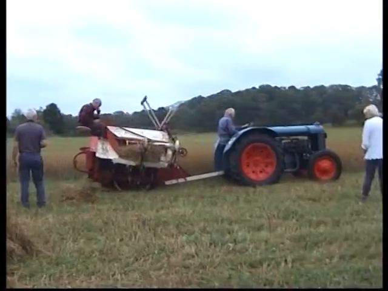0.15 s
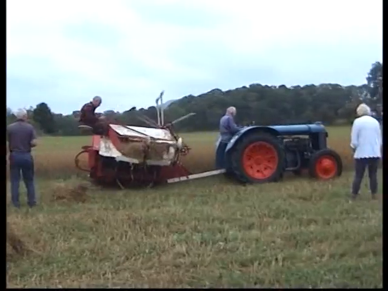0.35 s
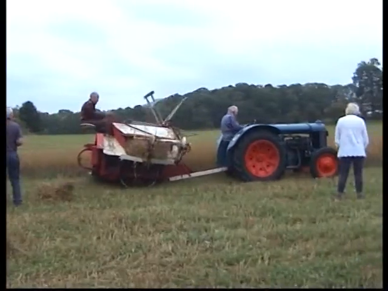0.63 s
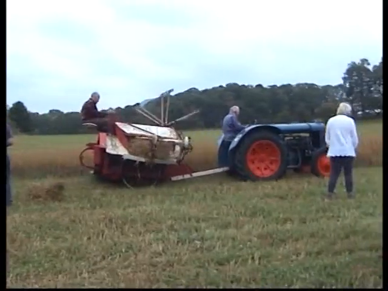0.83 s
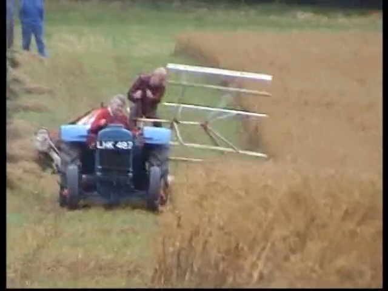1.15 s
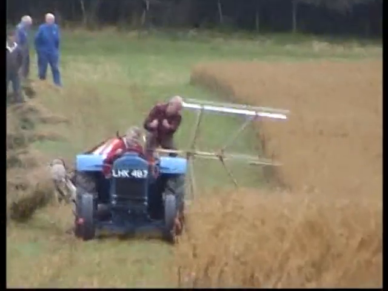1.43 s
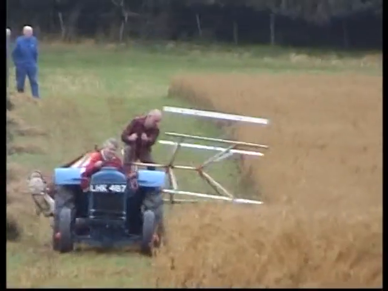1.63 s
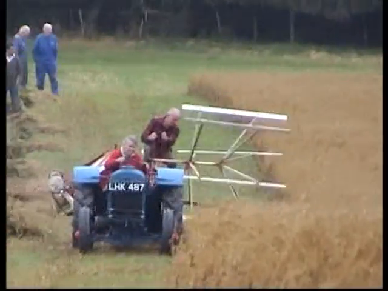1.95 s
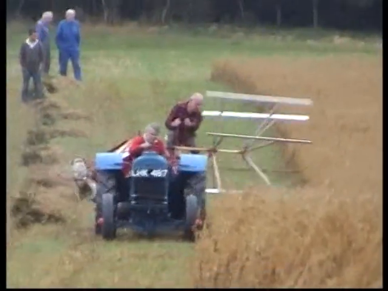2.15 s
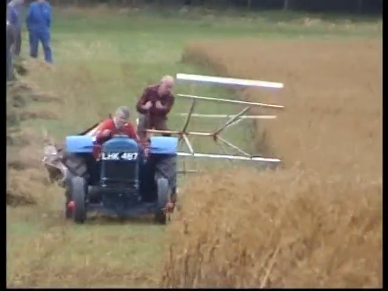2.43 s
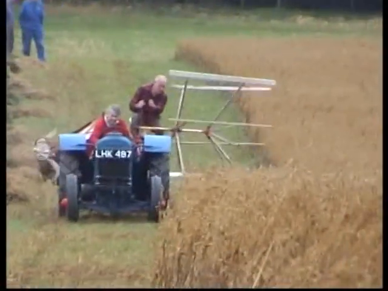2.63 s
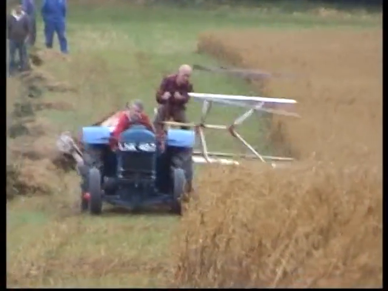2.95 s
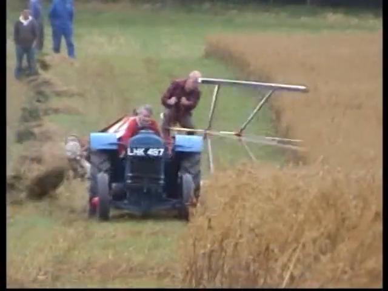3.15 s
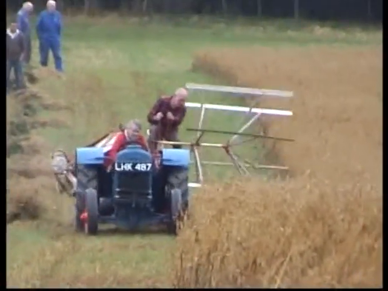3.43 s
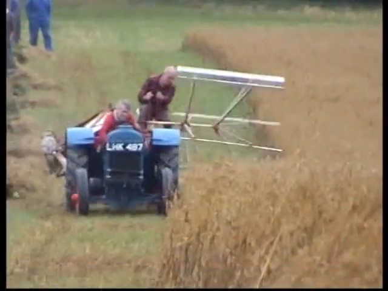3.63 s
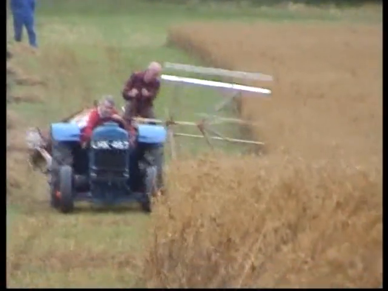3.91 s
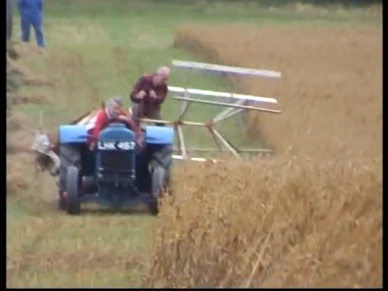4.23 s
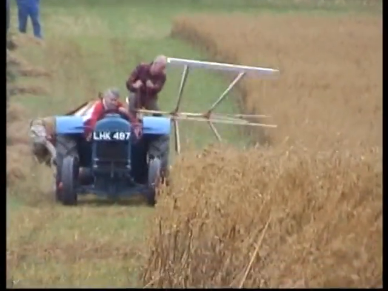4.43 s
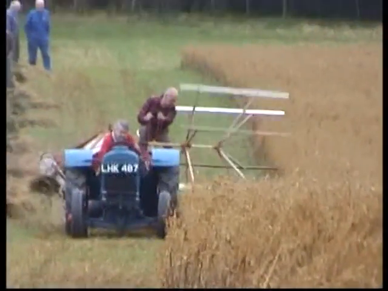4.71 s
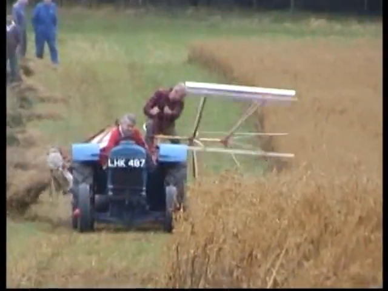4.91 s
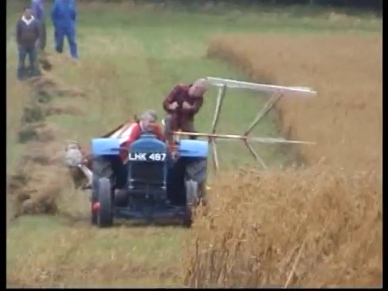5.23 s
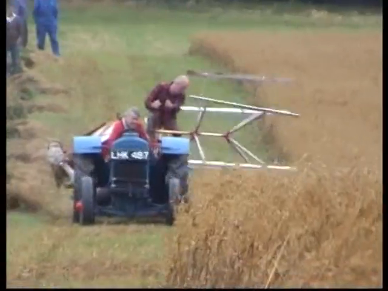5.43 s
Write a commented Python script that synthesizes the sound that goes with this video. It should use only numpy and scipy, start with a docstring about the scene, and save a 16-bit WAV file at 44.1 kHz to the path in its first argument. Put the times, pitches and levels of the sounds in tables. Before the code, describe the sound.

Loud throbbing engine, whining fan and rapid chain ticking suddenly drop to a soft, far-off tractor hum with cutting rustle and occasional metal clashes.

```python
"""An old four-cylinder tractor pulls a reaper-binder through a grain field, heard from two positions in turn.
Close and side-on, each firing drives an exhaust throb and rings the block; the fan whines, a drive chain ticks.
At 1.04 s it is abruptly far off and head-on: a soft drone of firing-rate harmonics, coloured noise for the
cutting, sheaves thrown out with metal clashes, small clinks, one dull knock, gliding chirps, faint steady tones."""
import sys
import numpy as np
from scipy import signal
from scipy.fft import rfft, irfft, next_fast_len
from scipy.io import wavfile

SR = 44100
rng = np.random.default_rng(int(sys.argv[2]) if len(sys.argv) > 2 else 0)


def transcribe(u):
    """Save the signal u as a 16-bit wav file named by the first command-line argument.

    u: samples, shape (n,) or (channels, n), limited to [-1, 1]; the rate is SR.
    q: integer samples, one column per channel.
    """
    v = np.clip(np.atleast_2d(u).T, -1, 1)
    q = np.round(v * 32767).astype(np.int16)
    wavfile.write(sys.argv[1], SR, q)


N = 245637
TIME = np.arange(N) / SR
CUT_S = 1.0375  # end of the close position
FAN_PER_FIRING = 6.487  # fan blades passing per firing

# Resonances of the engine block: frequency_hz, width_hz, level_db
BLOCK_MODES = [(1093, 18, -6), (1275, 45, 2.5), (1335, 25, -6), (1443, 26, -2.5), (1513, 26, -2.5),
               (1690, 30, 0), (1900, 35, -2), (2005, 30, -2.5), (2190, 50, 0), (2350, 60, 1.5),
               (2546, 45, 3.5), (2660, 50, .5), (2810, 55, 2.5), (2900, 45, -1), (3290, 60, 4.5),
               (3560, 70, 3), (3730, 60, 3), (4720, 55, -1.5), (5090, 130, 1)]
# Resonances of the thin engine cover: frequency_hz, width_hz, level_db
COVER_MODES = [(3420, 89, -10), (3770, 110, -9), (4190, 60, -2), (4280, 70, 1), (4470, 58, -6),
               (4650, 180, -5)]
# The cylinders side-on, in firing order: puff_db, crack_db, block_db, cover_db
NEAR_FIRING_ORDER = [(-5.5, -22, -30.5, -32.5), (5.5, -24.5, -32, -20), (-3, -22.5, -28.5, -24),
                     (1.5, -27.5, -32.5, -19.5)]
# Coherence of left and right, close: frequency_hz, likeness (0 to 1)
NEAR_LIKENESS = [(500, .99), (2000, .97), (4000, .95), (8000, .72), (13000, .65)]
# Coherence of left and right, distant: frequency_hz, likeness (0 to 1)
FAR_LIKENESS = [(60, 0.61), (150, 0.46), (370, 0.38), (910, 0.52), (2260, 0.59), (5610, 0.43),
                (13900, 0.21)]


def from_db(db):
    """Amplitude ratio of a level: 20 dB is a factor of ten."""
    return np.exp(np.asarray(db) * (np.log(10) / 20))


def rms_one(x):
    """Normalise the effective value to 1."""
    return x / np.sqrt(np.mean(x ** 2) + 1e-20)


def in_time(rows):
    """Linear interpolation of each column against its first, at every sample."""
    s, *columns = np.transpose(rows)
    return [np.interp(TIME, s, column) for column in columns]


def per_bin(points):
    """Interpolation on a logarithmic frequency axis, at every FFT bin."""
    hz, value = np.transpose(points)
    bins_hz = np.fft.rfftfreq(next_fast_len(N), 1 / SR)
    return np.interp(np.log(bins_hz + 1), np.log(hz), value)


def colour(x, gain):
    """Linear filtering as multiplication of the spectrum."""
    size = next_fast_len(N)
    return irfft(rfft(x, size) * gain, size)[..., :N]


def drift(rate):
    """Slow chance: unit-spread random knots, rate per second, joined by straight lines."""
    knots = rng.standard_normal(int(N / SR * rate) + 2)
    return np.interp(TIME * rate, np.arange(len(knots)), knots)


def noise(likeness, spectrum=None):
    """Stereo noise of unit rms whose mid and side powers set the coherence in each band."""
    alike = np.clip(per_bin(likeness), 0, 1)
    gain = 1 if spectrum is None else from_db(per_bin(spectrum))
    mid, side = colour(rng.standard_normal((2, N)), gain * np.sqrt([1 + alike, 1 - alike]))
    return rms_one(np.array([mid + side, mid - side]))


def resonate(x, modes):
    """Parallel two-pole resonators; bandwidth fixes the damping, and alternate modes change sign."""
    out = 0
    for k, (hz, width, db) in enumerate(modes):
        r = np.exp(-np.pi * width / SR)
        poles = [1, -2 * r * np.cos(2 * np.pi * hz / SR), r * r]
        ring = (1 - r * r) / 2 * signal.lfilter([1, 0, -1], poles, x + 1e-18)
        out = out + (-1) ** k * from_db(db) * ring
    return out


def clicks(times, db):
    """Ideal impulses, one sample per event."""
    out = np.zeros(N)
    at = np.clip(np.round(np.asarray(times) * SR).astype(int), 0, N - 1)
    np.add.at(out, at, from_db(db))
    return out


def bursts(times, db, rise_s, decay_s):
    """Envelope of contacts: two exponentials in cascade give a quick swell and a decay."""
    rise, fall = np.exp(-1 / (SR * rise_s)), np.exp(-1 / (SR * decay_s))
    poles = np.convolve([1, -rise], [1, -fall])
    return signal.lfilter([1 - rise], poles, clicks(times, db) + 1e-18)


def strike(times, db, modes, spread_db, scatter_s, detune):
    """Modal impact: each hit rings every mode with its own strength, delay and pitch, decaying exponentially."""
    out = np.zeros(N)
    for hz, width, mode_db in modes:
        force, contact = rng.standard_normal((len(times), 2)).T
        starts = (np.maximum(times + scatter_s * rng.random(len(times)), 0) * SR).astype(int)
        gains = from_db(db + mode_db + np.clip(spread_db * force, -15, 5))
        pitches = hz * (1 + detune * contact)
        age = np.arange(int(1.5 * SR / width)) / SR
        fade = np.exp(-np.pi * width * age)
        for start, gain, pitch in zip(starts, gains, pitches):
            room = len(out[start:start + len(age)])
            ring = gain * fade * np.sin(2 * np.pi * pitch * age)
            out[start:start + room] += ring[:room]
    return out


def lines(turns, orders, flutter_db, flutter_rate, smear=0):
    """Fourier series of a rotating part; a cycle of four firings allows quarter multiples, smeared in phase."""
    out = 0
    for multiple, db in orders:
        k = round(4 * multiple) / 4
        late = smear * rng.uniform(-.5, 0.44) * (k % 1 > 0)  # whole multiples stay in phase
        level = from_db(db + flutter_db * drift(flutter_rate))
        out = out + level * np.cos(2 * np.pi * (k * turns + late))
    return np.sqrt(2) * out


def firings(turns, cylinders, uneven_db):
    """Periodic excitation: time and level of each whole turn, cycling through cylinders with random unevenness."""
    number = np.floor(turns).astype(int)
    at = np.flatnonzero(np.diff(number)) + 1
    db = np.take(cylinders, number[at], mode="wrap")
    return TIME[at], db + uneven_db * rng.standard_normal(len(at))


def place(x, balance, lag):
    """Stereo localisation by level difference per band and a right-side delay of lag samples."""
    tilt = per_bin(balance) / 2
    delay = np.exp(-2j * np.pi * np.fft.rfftfreq(next_fast_len(N)) * lag)
    return colour(x, np.array([from_db(tilt), from_db(-tilt) * delay]))


def steady_tones():
    """Stationary sinusoids: a low hum and a cluster of thin high tones."""
    # Faint tones: frequency_hz, level_db
    tones = [(50, -74), (100, -67.5), (350, -79), (400, -88), (5740, -84), (5806, -89), (5890, -92),
             (6254, -90.5), (6322, -91), (6369, -94)]
    return np.sqrt(2) * sum(from_db(db) * np.sin(2 * np.pi * (hz * TIME + rng.random())) for hz, db in tones)


def chirps():
    """Frequency modulation: faint whistles glide, waver and fade, phase being the integral of pitch."""
    # Chirps and squeaks: start_s, length_s, start_hz, end_hz, level_db, waver (share of pitch)
    whistles = [(1.125, .055, 5000, 5300, -69.5, .025), (1.463, .03, 7300, 6100, -74, .02),
                (1.483, .035, 5280, 5450, -72, .015), (1.515, .13, 4830, 4770, -71, .005),
                (1.518, .035, 7250, 7150, -74, .025), (1.6, .04, 7200, 7150, -74, .025),
                (2.035, .05, 4500, 4770, -71, .01), (2.1, .045, 4640, 4700, -72, .007),
                (2.47, .12, 3380, 3320, -69, .02), (2.865, .085, 4100, 4020, -71, .005)]
    out, waver = np.zeros(N), drift(500)
    for s, length, start_hz, end_hz, db, rough in whistles:
        now = (TIME >= s) & (TIME < s + length)
        along = (TIME[now] - s) / length
        glide = end_hz + (start_hz - end_hz) * (1 - along) ** 2
        pitch = glide * (1 + rough * waver[now])
        swell = np.sqrt(2 * np.abs(np.sin(np.pi * along)))
        out[now] += from_db(db) * swell * np.sin(2 * np.pi * np.cumsum(pitch) / SR)
    return out * from_db(1.5 * drift(120))


def thud():
    """Heavily damped modes: a dull knock with a slight rebound."""
    # Blow and rebound: start_s, level_db
    blows = [(3.2495, -37), (3.2558, -46)]
    # Resonances of the struck part: frequency_hz, width_hz, level_db
    dull_modes = [(470, 100, -11), (640, 90, 2), (760, 130, -9), (1450, 160, -10), (1920, 260, -3.5)]
    s, db = np.transpose(blows)
    ring = strike(s, db, dull_modes, spread_db=0, scatter_s=0, detune=0)
    return signal.sosfilt(signal.butter(2, [330, 2700], "band", fs=SR, output="sos"), ring)


def binder_clinks():
    """Impact with rebound: loose metal parts touch, bounce once and ring briefly at one mode."""
    # Single clinks: start_s, frequency_hz, level_db
    clinks = [(1.762, 4400, -67), (1.958, 3330, -61), (2.287, 2400, -65), (2.513, 3380, -60),
              (2.635, 3280, -62), (2.767, 3300, -59), (2.828, 4450, -60), (3.042, 3870, -60),
              (3.043, 2600, -57), (3.152, 3800, -58), (3.289, 4470, -60), (3.443, 4330, -57),
              (3.467, 4330, -58), (3.506, 4460, -59), (3.641, 3200, -58), (3.665, 4550, -61),
              (3.692, 3200, -61), (4.128, 3700, -56), (4.16, 4200, -59), (5.222, 3800, -58)]
    width_hz, bounce_s = 41, 0.0045
    out = np.zeros(N)
    for s, hz, db in clinks:
        contacts = np.array([s, s + bounce_s])
        out += strike(contacts, db, [(hz, width_hz, 0)], spread_db=1, scatter_s=.001, detune=.02)
    return out


def binder_clashes():
    """Noise under impact envelopes: the discharge arms clash and the sheaf crackles out more slowly."""
    # Sheaves thrown out: start_s, strength_db (relative)
    clashes = [(1.6945, -44), (3.1423, -48), (3.428, -38), (3.4484, -55), (3.5086, -52), (3.5262, -54),
               (5.169, -43)]
    # Spectrum of the clash: frequency_hz, level_db
    clash_colour = [(1000, -13), (2300, 0), (4400, 4), (6000, -1), (8200, -4), (11000, -18), (13000, -33)]
    s, db = np.transpose(clashes)
    clash = bursts(s, db - 8.5, rise_s=0.0015, decay_s=0.0064)
    straw = bursts(s, db - 22, rise_s=0.0081, decay_s=0.04) * from_db(3 * drift(250))
    return noise(FAR_LIKENESS, clash_colour) * (clash + straw)


def far_chatter():
    """Random impacts on lightly damped modes: the binder's steel parts chatter without pause."""
    # Resonances of the steel parts: frequency_hz, width_hz, level_db
    chatter_modes = [(1090, 14, -1), (1490, 60, 6), (1700, 50, 4), (2010, 60, 0), (2320, 60, 3),
                     (2470, 70, 2), (2680, 55, 1), (3020, 60, -1), (3180, 60, 1), (3360, 40, 1),
                     (3530, 70, -2), (4070, 50, -2), (4230, 60, -1)]
    s = rng.uniform(CUT_S, N / SR, size=300)
    return strike(s, -71.5, chatter_modes, spread_db=5, scatter_s=.02, detune=.006)


def far_tappet(turns):
    """Cyclic impact: a loose tappet ticks once per engine cycle of four firings."""
    # Strength of the tick: time_s, level_db
    tick_strength = [(1.1, -74), (3.3, -68), (3.7, -58), (4.6, -59), (5.57, -66)]
    # Resonances of the tick: frequency_hz, width_hz, level_db
    tick_modes = [(2310, 64, 1.5), (2420, 73, -6)]
    after_firings = .8  # place in the cycle
    s, db = firings((turns - after_firings) / 4, [0], uneven_db=1.5)
    db = db + np.interp(s, *np.transpose(tick_strength))
    return strike(s, db, tick_modes, spread_db=2, scatter_s=.003, detune=.015)


def far_cutting(effort_db):
    """Broadband noise with slight level fluctuation: the machinery's murmur and the rustle of cutting."""
    # Spectrum of the machinery: frequency_hz, level_db
    machinery_colour = [(150, -23), (380, -7.5), (520, -0.5), (690, 4), (850, 1), (1100, -3), (1500, -2),
                        (1850, -10), (2600, -29)]
    # Spectrum of the rustle: frequency_hz, level_db
    rustle_colour = [(1200, -27), (1900, -3.5), (2400, 2.5), (2800, -0.5), (3400, -0.5), (3900, -3),
                     (4400, -1.5), (5100, -8), (6500, -6.5), (8500, -17.5), (10500, -13), (11900, -35),
                     (12700, -39)]
    machinery = from_db(effort_db + 8.5 + 0.77 * drift(60)) * noise(FAR_LIKENESS, machinery_colour)
    rustle = from_db(-63.5 + 1.1 * drift(120)) * noise(FAR_LIKENESS, rustle_colour)
    return machinery + rustle


def far_fan(turns):
    """Blade-passing harmonics locked to the engine: a hum, and a whine of varying level at the third."""
    # Hum lines: multiple of the blade rate, level_db
    hum_lines = [(1, -63), (2, -76), (4, -74), (5, -91)]
    # Level of the whine: time_s, level_db (the line lies 1.5 dB lower)
    whine_level = [(1.1, -69), (1.2, -63.5), (1.27, -70), (1.34, -63.5), (1.42, -70), (1.9, -73),
                   (1.95, -64), (2.43, -69), (3.3, -65), (3.5, -63), (3.81, -60), (3.86, -66.5),
                   (5.27, -68.5), (5.44, -59), (5.57, -70)]
    whine_db, = in_time(whine_level)
    blades = turns * FAN_PER_FIRING + 0.02 * drift(12)
    hum = lines(blades, hum_lines, flutter_db=1.5, flutter_rate=8)
    return hum + from_db(whine_db) * lines(blades, [(3, -1.5)], flutter_db=2.5, flutter_rate=22)


def far_knocks(turns):
    """Modal ringing at a distance: each firing clinks the block, every second one rings the cover."""
    # Strength of the cover's ring: time_s, level_db
    cover_strength = [(1.1, -67), (2.5, -66), (2.85, -63), (3.6, -63), (3.9, -65), (4.4, -64.5),
                      (5.57, -66.5)]
    cover_lead_s = 0.01  # ahead of the puff
    s, _ = firings(turns, [0], uneven_db=0)
    ring = strike(s, 0, BLOCK_MODES, spread_db=5, scatter_s=0.02, detune=0.0044)
    block = from_db(-72) * rms_one(ring)
    s, db = firings(turns / 2, [0], uneven_db=1.5)
    db = db + np.interp(s, *np.transpose(cover_strength))
    cover = strike(s - cover_lead_s, db, COVER_MODES, spread_db=2, scatter_s=.012, detune=.03)
    return block + cover


def far_exhaust(turns, effort_db):
    """Harmonics of the firing rate form a drone, over impulse-driven pipe resonances and low noise."""
    # Exhaust lines: multiple of the firing rate, level_db
    exhaust_lines = [(1, -68.5), (1.25, -77), (1.75, -73.5), (2, -59.5), (2.25, -78), (2.5, -76.5),
                     (3, -69), (3.25, -70), (3.5, -74.5), (3.75, -72), (4, -64), (4.25, -72), (4.5, -73),
                     (4.75, -75.5), (5, -73.5), (5.25, -77), (5.5, -75.5), (5.75, -79), (6, -79.5),
                     (6.25, -78), (6.75, -82), (7, -83), (7.5, -78)]
    # Relative puff of each cylinder in firing order: level_db
    cylinders = [10, -11, 1, 0]
    # Resonances of the pipe: frequency_hz, width_hz, level_db
    pipe_modes = [(112, 18, 0), (203, 22, -4), (274, 15, -2)]
    # Puffs hardening under load: time_s, level_db
    load = [(1.1, -79), (3, -77), (3.5, -72), (5.1, -75.5), (5.35, -65), (5.57, -66)]
    # Spectrum of the rumble: frequency_hz, level_db
    rumble_colour = [(22, -33), (34, -18), (48, -12), (62, -5), (85, -10), (110, -0.5), (170, 0.5),
                     (260, -1.5), (380, -9.5), (700, -36)]
    throb = lines(turns, exhaust_lines, flutter_db=1, flutter_rate=6, smear=1)
    puff_db, = in_time(load)
    puffs = rms_one(resonate(clicks(*firings(turns, cylinders, uneven_db=1.0)), pipe_modes))
    rumble = from_db(effort_db + 8) * noise(FAR_LIKENESS, rumble_colour)
    return throb + from_db(puff_db) * puffs + rumble


def far_rig():
    """Superposition from afar: engine phase, the integral of its speed, times drone, fan and knocks."""
    # Engine speed: time_s, firings_per_s
    engine_speed = [(1.1, 37.0), (1.55, 37.3), (1.8, 36.65), (2.05, 36.45), (2.28, 37.05), (2.65, 37.2),
                    (2.85, 36.85), (3.1, 37.0), (3.42, 36.35), (3.75, 36.65), (4.0, 37.05), (4.3, 36.7),
                    (4.85, 36.4), (5.2, 36.75), (5.42, 37.35), (5.57, 36.8)]
    # Engine effort, a little more at the end: time_s, effort_db (each noise layer adds its own offset)
    effort = [(1.1, -65.5), (5.15, -65), (5.45, -63.5)]
    phase_zero_s = 3.24  # a firing at which the cycle's phase is zero
    speed, = in_time(engine_speed)
    effort_db, = in_time(effort)
    turns = np.cumsum(speed) / SR
    turns = turns - np.interp(phase_zero_s, TIME, turns)
    engine = far_exhaust(turns, effort_db) + far_knocks(turns) + far_tappet(turns)
    return engine + far_fan(turns) + far_cutting(effort_db) + far_chatter()


def near_wash():
    """Broadband noise whose level flutters, plus panel resonances driven by such noise."""
    # Resonances of the panels: frequency_hz, width_hz, level_db
    panel_modes = [(309, 34, -3.5), (351.3, 14, -1.5), (384, 22, -2), (544, 23, 0), (562, 48, -4),
                   (687, 75, -3), (776, 27, -14)]
    # Spectrum of the wash: frequency_hz, level_db
    wash_colour = [(25, -33), (55, -13), (120, -16.5), (260, -11.5), (330, -4.5), (458, -19), (662, -4.5),
                   (934, -10), (1600, -10.5), (2560, -11.5), (4300, -16), (5360, -19.5), (6860, -13.5),
                   (13000, -29), (14400, -42)]
    shaking = noise(NEAR_LIKENESS) * from_db(2.0 * drift(90))
    panels = from_db(-31.5) * rms_one(resonate(shaking, panel_modes))
    return panels + from_db(-26.5 + 1.7 * drift(150)) * noise(NEAR_LIKENESS, wash_colour)


def near_clatter():
    """Random modal impacts: loose binder parts tick at varied pitches, and now and then a bar rings out."""
    # Resonances of the loose parts: frequency_hz, width_hz, level_db
    loose_modes = [(2400, 45, 0), (3300, 55, 0), (3970, 80, -2), (5400, 110, -3), (6800, 200, -2),
                   (9300, 600, -3)]
    # Bars ringing out: start_s, frequency_hz, level_db
    bar_rings = [(.268, 1695, -23.5), (.53, 2005, -26.5), (.735, 1520, -28), (0.792, 2515, -36)]
    bar_width_hz = 8.6
    s = np.sort(rng.uniform(0, CUT_S, size=70))
    out = strike(s, -30.5, loose_modes, spread_db=4, scatter_s=.003, detune=.12)
    for start, hz, db in bar_rings:
        out += strike(np.array([start]), db, [(hz, bar_width_hz, 0)], spread_db=0, scatter_s=0, detune=0)
    return out


def near_chain():
    """Meshing impacts: links tick on the sprocket, slightly uneven, with a part opposed between the sides."""
    # Resonances of the chain: frequency_hz, width_hz, level_db
    chain_modes = [(6040, 78, 0), (6560, 153, 5), (6380, 110, -5), (6960, 156, 9.5), (7140, 220, 1),
                   (7180, 200, 4)]
    links_per_s, first_link_s = 48.08, .0168
    link_db, uneven_db, jitter_s = -26.5, 0.5, 0.0011
    rise_db_per_s, off_axis_db = 1, -21  # it grows as the binder draws level
    s = np.arange(first_link_s, CUT_S, 1 / links_per_s)
    slack, force = rng.standard_normal((len(s), 2)).T
    db = link_db + rise_db_per_s * (s - CUT_S / 2) + uneven_db * force
    s = s + jitter_s * slack
    ring = strike(s, db, chain_modes, spread_db=2.0, scatter_s=0.0038, detune=0.035)
    off_axis = strike(s, db + off_axis_db, chain_modes, spread_db=4, scatter_s=.012, detune=.025)
    lowpass = signal.butter(2, 9000, fs=SR, output="sos")
    return signal.sosfilt(lowpass, [ring + off_axis, ring - off_axis])


def near_fan(turns):
    """Blade-passing harmonics locked to the engine, the belt slipping a little."""
    # Whine lines: multiple of the blade rate, level_db (relative)
    whine_lines = [(3, 0), (5, -9)]
    # Fundamental hum: time_s, level_db (relative)
    hum_level = [(0, -2.5), (.4, -7.5), (.55, -11), (1.03, -7.5)]
    hum_db, = in_time(hum_level)
    blades = turns * FAN_PER_FIRING + 0.012 * drift(9.6)
    return from_db(-36.5) * lines(blades, [(1, hum_db)] + whine_lines, flutter_db=3.0, flutter_rate=18.7)


def near_gear():
    """Tooth-meshing tone: a fluttering 882 Hz whine that swells as the rig passes."""
    # Swell of the whine: time_s, level_db
    gear_swell = [(0, -54), (.74, -53), (.86, -38), (1.03, -38.5)]
    swell_db, = in_time(gear_swell)
    return from_db(swell_db) * lines(882 * TIME, [(1, 0.0011)], flutter_db=4.0, flutter_rate=26)


def near_knocks(turns):
    """Impact excitation: each firing gives a gritty crack and rings block and cover, the cover unequally."""
    # Spectrum of the crack: frequency_hz, level_db
    knock_colour = [(300, -19), (700, -5.5), (1400, -21), (2600, 6), (3800, 0), (5200, 5.5), (7000, 2.5),
                    (9000, -2), (14000, -15)]
    lead_s, jitter_s = .004, .001  # the knock comes just before its puff leaves the pipe
    cover_lead_s = .0025  # the cover rings ahead of the knock
    _, crack_db, block_db, cover_db = np.transpose(NEAR_FIRING_ORDER)
    s, crack_db = firings(turns, crack_db, uneven_db=1.2)
    _, block_db = firings(turns, block_db, uneven_db=1.2)
    _, cover_db = firings(turns, cover_db, uneven_db=1)
    s = s - lead_s + jitter_s * rng.standard_normal(len(s))
    grit = rms_one(from_db(2.5 * drift(1500)))
    envelope = bursts(s, crack_db, rise_s=0.00096, decay_s=0.0084)
    crack = grit * noise(NEAR_LIKENESS, knock_colour) * envelope
    block = strike(s, block_db, BLOCK_MODES, spread_db=4.5, scatter_s=.01, detune=.004)
    cover = strike(s - cover_lead_s, cover_db, COVER_MODES, spread_db=3, scatter_s=.006, detune=.022)
    return crack + block + cover


def near_exhaust(turns):
    """Harmonics of the firing rate throb once per cycle, and each puff excites the pipe's resonances."""
    # Exhaust lines: multiple of the firing rate, level_db
    exhaust_lines = [(1, -58), (1.25, -60), (1.75, -58), (2, -36.5), (2.25, -74), (2.5, -51.5),
                     (2.75, -47.5), (3, -39), (3.25, -45.5), (3.5, -53), (3.75, -52), (4, -45.5),
                     (4.25, -56), (4.75, -60), (5, -52.5), (5.5, -55.5), (5.75, -55), (6, -54)]
    # Resonances of the pipe: frequency_hz, width_hz, level_db
    pipe_modes = [(175, 25, 0), (216, 23, 0), (304.7, 120, 0.5), (372, 56, -1)]
    throb_origin = 2  # place in the firing order where the throb's phase is zero
    puff_db = np.transpose(NEAR_FIRING_ORDER)[0]
    throb = lines(turns - throb_origin, exhaust_lines, flutter_db=.3, flutter_rate=12, smear=.45)
    puffs = rms_one(resonate(clicks(*firings(turns, puff_db, uneven_db=1.5)), pipe_modes))
    return throb + from_db(-45.0) * puffs


def near_rig():
    """Superposition side-on: one steady engine phase times exhaust, knocks and fan beside the binder."""
    firing_hz, first_puff_s = 33.63, .0239
    turns = (TIME - first_puff_s) * firing_hz
    engine = near_exhaust(turns) + near_knocks(turns[TIME < CUT_S])
    whines = near_fan(turns) + near_gear()
    return engine + near_clatter() + near_chain() + whines + near_wash()


def scene():
    """A 1.4 ms linear crossfade leads from the close position to the duller, low-passed distant one."""
    # Balance of the sides, close: frequency_hz, left_minus_right_db
    near_balance = [(110, 4.5), (200, 4.5), (370, -3), (2300, -2), (7600, -1), (13900, 1.5)]
    # Balance of the sides, distant: frequency_hz, left_minus_right_db
    far_balance = [(60, 13), (110, 9), (200, 5), (370, 0), (680, 0.5), (1240, -2), (2260, 0.5),
                   (4150, -0.5), (7600, -2), (13900, 0.5)]
    close = np.clip((CUT_S - TIME) / 0.0014, 0, 1)
    near = place(near_rig(), near_balance, lag=0.58)
    binder = binder_clashes() + binder_clinks()
    distant = far_rig() + binder + thud() + chirps() + steady_tones()
    far = place(distant, far_balance, lag=0.89)
    far = signal.sosfilt(signal.ellip(8, .1, 60, 12000, fs=SR, output="sos"), far)
    # the deepest bass is shed
    near, far = signal.sosfilt(signal.butter(2, 22, "high", fs=SR, output="sos"), [near, far])
    return close * near + (1 - close) * far


def record(dry):
    """Band limitation: a steep low-pass removes what lies above 14.3 kHz."""
    return signal.sosfilt(signal.ellip(10, .1, 80, 14300, fs=SR, output="sos"), dry)


dry = scene()
out = record(dry)
transcribe(out)
```